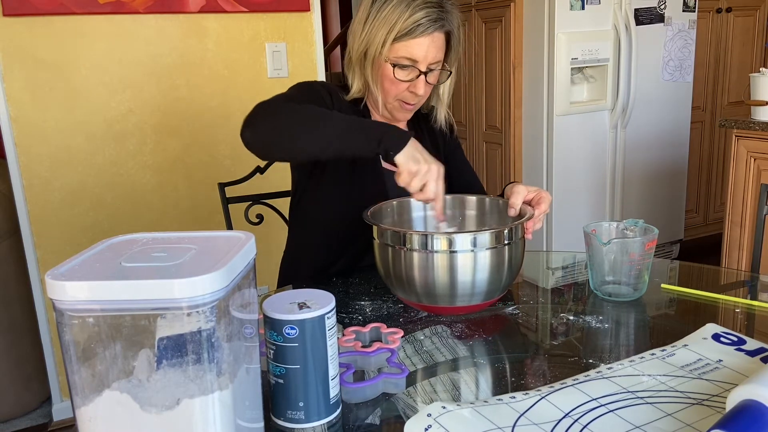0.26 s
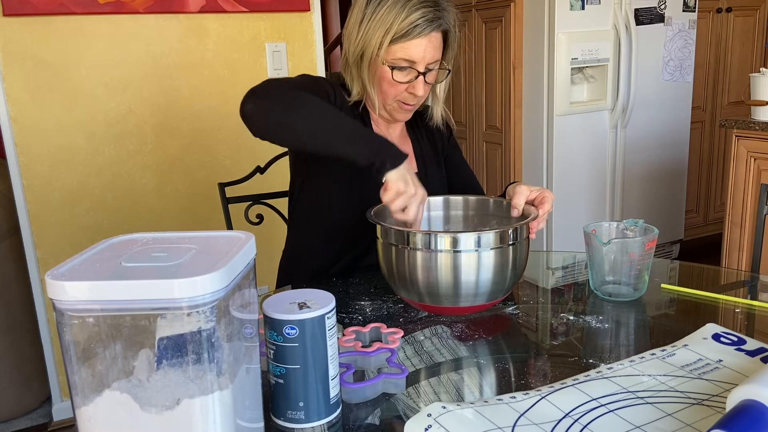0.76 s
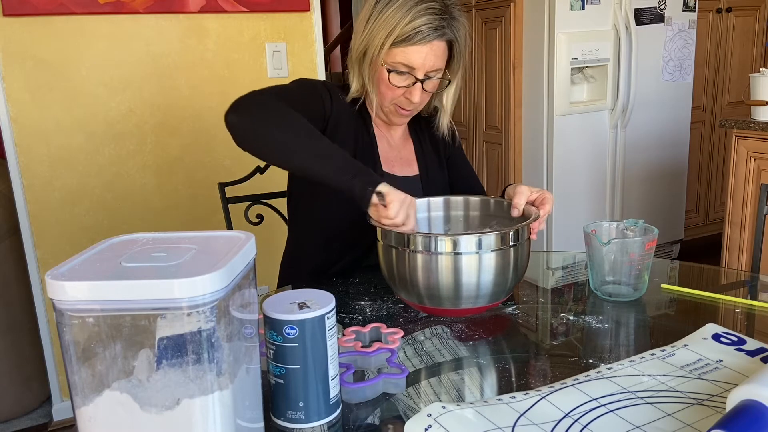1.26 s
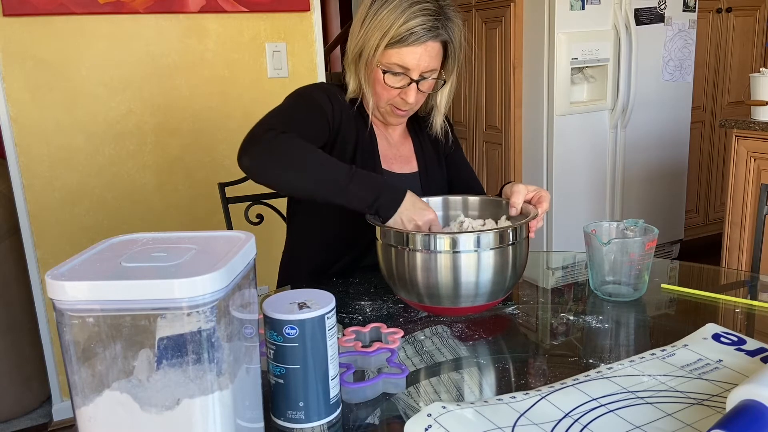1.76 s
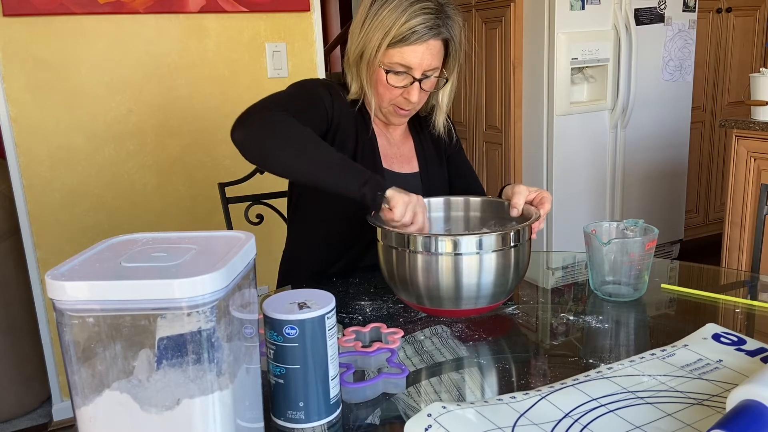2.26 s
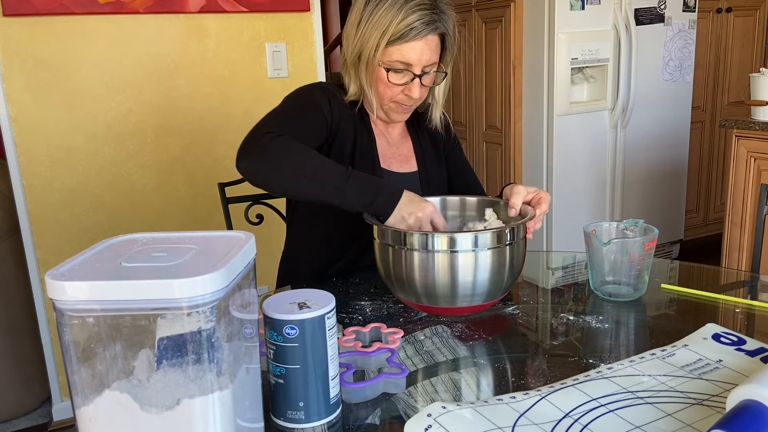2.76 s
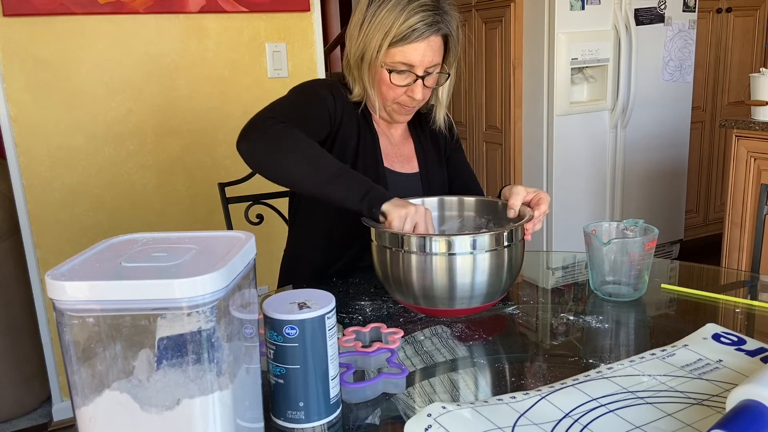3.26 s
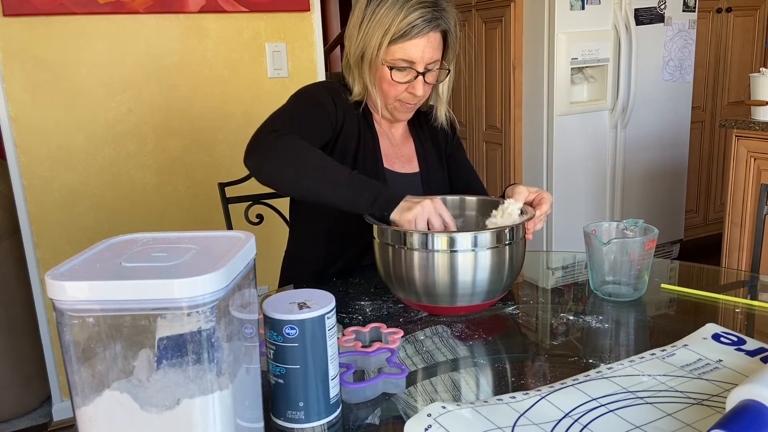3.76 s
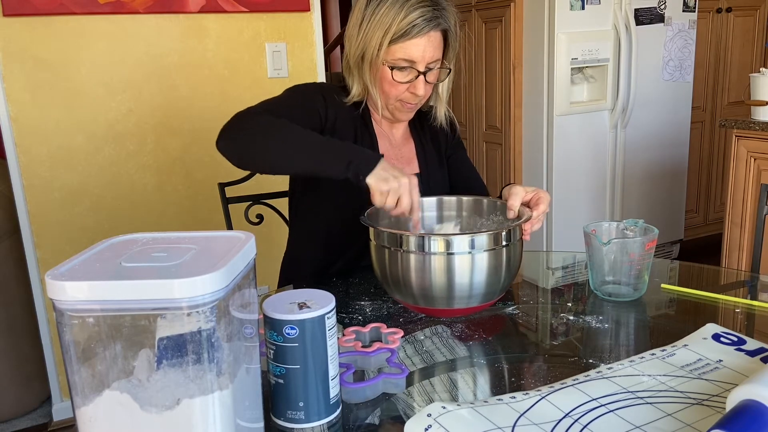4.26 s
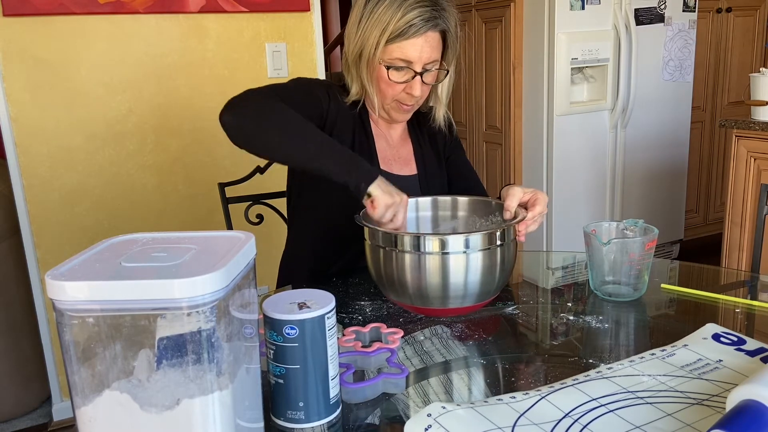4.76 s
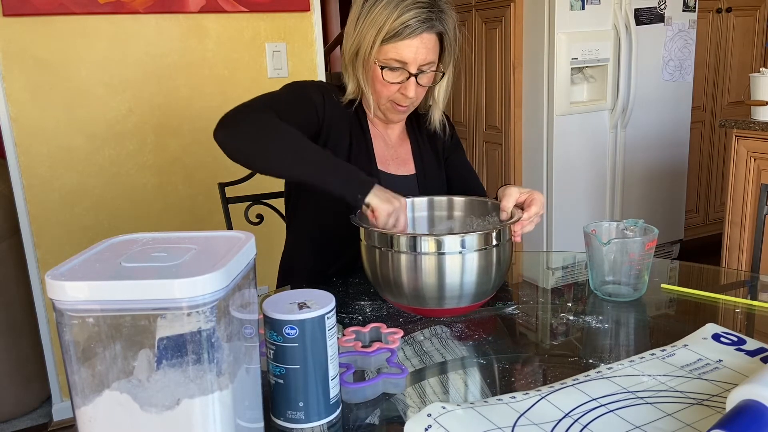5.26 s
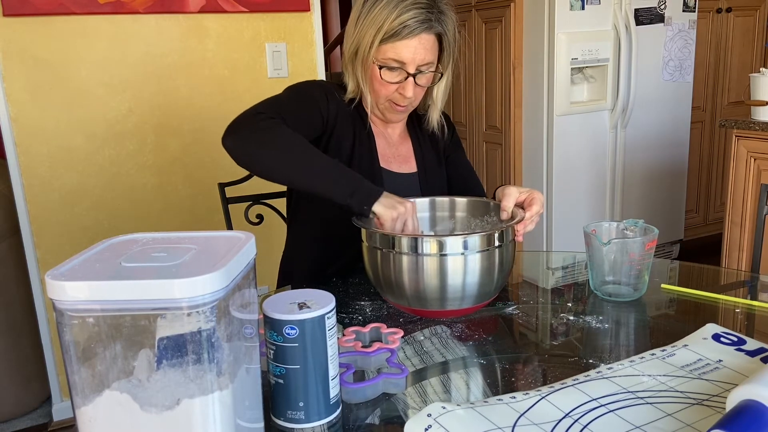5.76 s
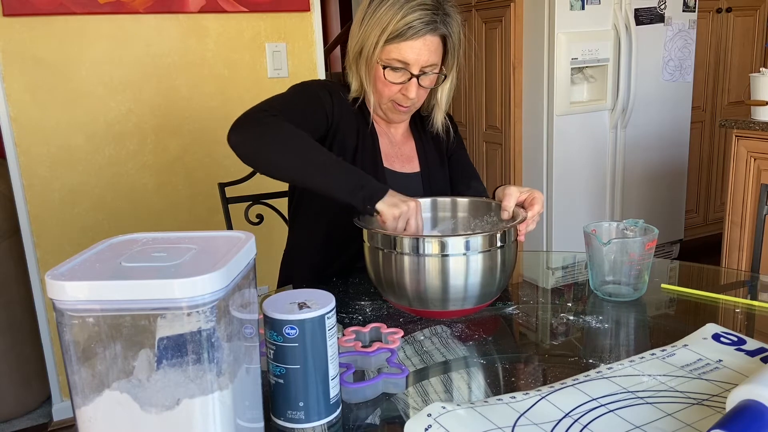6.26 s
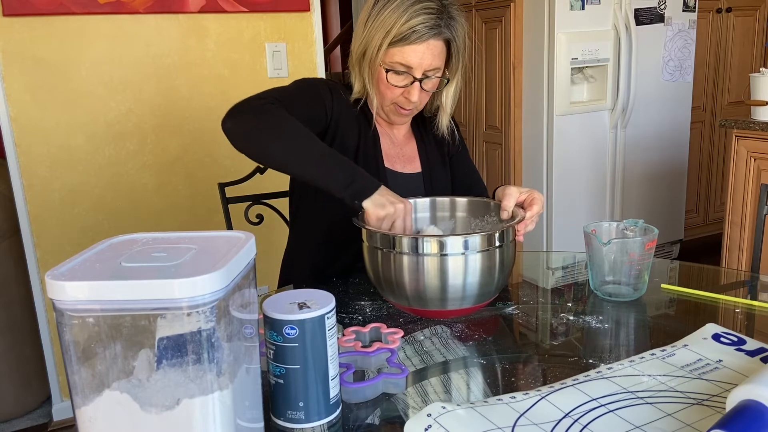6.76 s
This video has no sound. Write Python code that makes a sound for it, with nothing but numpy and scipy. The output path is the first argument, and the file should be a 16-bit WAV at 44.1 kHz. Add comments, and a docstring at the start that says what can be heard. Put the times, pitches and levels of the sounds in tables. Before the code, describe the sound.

Uneven stirring of thick dough in a metal bowl: one sharp clank early, then gritty scrapes, shrill steel rasps and floury swishes.

```python
"""Stiff dough is stirred in a steel bowl held by the rim on a kitchen table: loose flour swishes first, as noise swells.
Then strokes of the utensil grind and slide along the wall as filtered noise; some land with a knock, a dying sine.
Skids, rasps, taps and thumps on the table follow at listed times; swishes fill the gaps; of two faint squeaks, one
comes before the middle and one near the end. Damped modes ring after contacts with the wall. Throughout, a small
room reverberates, its low rumble goes on and a refrigerator hums in wavering sines."""
import sys
import numpy as np
from scipy import signal
from scipy.fft import rfft, irfft
from scipy.io import wavfile
from scipy.ndimage import uniform_filter1d

SR = 44100
rng = np.random.default_rng(int(sys.argv[2]) if len(sys.argv) > 2 else 0)


def to_wav(s):
    """Save 16-bit WAV."""
    ch = np.atleast_2d(s).T  # columns
    pcm = np.round(np.clip(ch, -1, 1) * 32767)  # PCM
    wavfile.write(sys.argv[1], SR, pcm.astype(np.int16))


N = 308259
TIME = np.arange(N) / SR
FREQS = np.fft.rfftfreq(N, 1 / SR)


def amp(db):
    """Decibels to gain."""
    return 10 ** (np.asarray(db) / 20)


def unit(x):
    """Scales to rms 1."""
    return x / np.sqrt(np.mean(x ** 2) + 1e-20)


def read(points, hz):
    """Interpolates a table on a log-frequency axis."""
    f, value = np.transpose(points)
    return np.interp(np.log(hz + 1), np.log(f + 1), value)


def add(mix, start_s, sound):
    """Adds a sound into the mix in place, cut at the end of the mix."""
    part = mix[max(round(start_s * SR), 0):][:len(sound)]
    part += sound[:len(part)]


def wander(rate_hz):
    """Random drift of rms 1, rolled off steeply above the rate."""
    spectrum = rfft(rng.standard_normal(N))
    return unit(irfft(spectrum / (1 + (FREQS / rate_hz) ** 4), N))


def colour(x, spectrum, size=4096):
    """Minimum-phase filter of unit energy whose skirts fall steeply outside the table."""
    hz = abs(np.fft.fftfreq(size, 1 / SR)) + 1
    low_skirt = np.minimum(hz / spectrum[0][0], 1) ** 4
    high_skirt = np.minimum(spectrum[-1][0] / hz, 1) ** 8
    log_gain = np.log(amp(read(spectrum, hz)) * low_skirt * high_skirt + 1e-5)
    taps = np.fft.ifft(np.exp(signal.hilbert(log_gain).conj())).real[:size // 2]
    return signal.oaconvolve(x, taps / np.linalg.norm(taps))[:N]


def slips(per_s, spread_db, smooth):
    """Friction as tiny random slips of uneven size over a smooth rub; rms 1."""
    size = amp(spread_db * np.minimum(rng.exponential(1, N), 4))
    hits = rng.random(N) < per_s / SR
    grains = size * rng.standard_normal(N) * hits
    return unit(unit(grains) + smooth * rng.standard_normal(N))


def travelling(x, patchy_db):
    """As the contact point travels it feeds ever different wall resonances: drifting gain patches."""
    z = signal.stft(x, nperseg=512, noverlap=384)[2]
    patches = rng.standard_normal(z.shape)
    for size, axis in [(3, 0), (2, 0), (14, 1), (7, 1)]:  # axis 0: frequency, 1: time
        patches = uniform_filter1d(patches, size, axis)
    return signal.istft(z * amp(patchy_db * unit(patches)), nperseg=512, noverlap=384)[1][:N]


# Colours of the three kinds of friction. Each row: frequency in Hz, relative density in dB.
GRIND_COLOUR = [(330, -7), (550, -2.5), (800, 0), (1250, 0), (1600, -4), (2100, -2), (3100, -4), (4300, -4),
                (5200, -9.5)]
SLIDE_COLOUR = [(4300, -13), (4650, -3.5), (5100, -6.5), (5600, -0.5), (6200, 0), (6800, -2), (7400, -5.5),
                (8200, -7.5), (9000, -28)]
FIZZ_COLOUR = [(7500, 11.2), (8600, 1.5), (9800, 6), (10700, 5), (12000, 1.5), (13500, 5.5), (14800, 0),
               (15600, 4)]
JUDDER_DB = 1.3  # rms unevenness of the push in the grinding


def scraping():
    """Friction along the wall; one uneven push of the hand shakes grinding, sliding and fizz together."""
    grind_db, slide_db, fizz_db, bite_db = friction_levels()
    judder = wander(rate_hz=62)

    rub = travelling(slips(per_s=1400, spread_db=1.0, smooth=0.84), patchy_db=4.0)
    rub = rub * amp(grind_db + JUDDER_DB * judder - 5.5)
    dull = signal.sosfiltfilt(signal.butter(2, 1500, fs=SR, output="sos"), rub)
    lift = amp(bite_db / 2)
    grind = colour(dull / lift + (rub - dull) * lift, GRIND_COLOUR)

    skid = travelling(slips(per_s=2900, spread_db=2.5, smooth=1.0), patchy_db=3.0)
    slide = colour(skid * amp(slide_db + 0.57 * JUDDER_DB * judder - 6.5), SLIDE_COLOUR)

    flour = travelling(rng.standard_normal(N), patchy_db=2.5)
    fizz = colour(flour * amp(fizz_db + 0.52 * judder + 2.0), FIZZ_COLOUR)

    # pressure carried into the table
    pressure = rng.standard_normal(N) * amp(grind_db - 11)
    rumble = colour(pressure, [(35, -3.5), (120, 1.5), (350, -22.5)])
    return grind + slide + fizz + rumble


# Utensil pushed through dough along the wall. Each row: start in seconds, length in seconds,
# rise in seconds, grinding in dB, bite (upper against lower grinding) in dB, edge sliding on steel in dB.
STROKE_ROWS = [ (0.422, 0.023, 0.0059, -38, 8.5, -38), (1.161, 0.55, 0.0018, -56, -2.5, -52.5),
               (2.251, 0.077, 0.052, -37, -5.5, -42.5), (2.336, 0.27, 0.025, -49.5, -2.5, -44.5),
               (3.235, 0.071, 0.035, -39, -9, -42), (3.305, .23, 0.11, -46.5, -6, -44),
               (3.981, 0.1, 0.015, -43.5, -6, -49), (4.513, 0.013, 0.0051, -53, -1, -47),
               (4.589, 0.094, 0.058, -44.5, -1.5, -51), (5.032, .18, 0.14, -43.5, -1.5, -43.5),
               (5.607, 0.11, 0.049, -42.5, -10, -43), (6.062, 0.14, 0.11, -38.5, -4, -40),
               (6.603, 0.097, 0.055, -44, -2, -40.5), ]
# Edge on bare steel as it enters or leaves the dough. Each row: start in seconds, length in seconds,
# sliding in dB, flour fizz in dB.
SKID_ROWS = [(0.425, 0.03, -30, -38.5), (1.179, 0.042, -40.5, -53), (1.673, 0.027, -40, -61),
             (2.317, 0.05, -41, -49), (2.486, 0.098, -34.5, -48), (2.58, 0.056, -42, -51),
             (3.51, 0.051, -39.5, -49.5), (4.077, .03, -53, -55), (4.506, .033, -57, -53.5),
             (5.029, .02, -46, -53.5), (5.062, 0.021, -34.5, -43.5), (5.223, 0.052, -44, -55.5),
             (5.567, 0.077, -37, -46.5), (5.745, 0.03, -44, -57), (6.053, 0.2, -37, -49.5),
             (6.269, 0.026, -40.5, -53), (6.53, 0.02, -57, -76), (6.572, 0.025, -37, -41.5)]
# Loose flour as the dough turns over. Each row: time of the peak in seconds,
# rise and equal fall in seconds, hiss in dB.
SWISH_ROWS = [(0.075, 0.15, -59), (0.292, 0.11, -69), (0.68, 0.17, -62.5), (0.85, 0.11, -78),
              (1.02, .07, -70.5), (1.61, .35, -54.5), (1.872, 0.19, -68), (2.13, 0.25, -80),
              (2.802, 0.34, -67.5), (3.03, 0.31, -66), (3.225, 0.1, -57.5), (3.709, 0.29, -64.5),
              (3.913, 0.085, -65), (4.18, 0.12, -63.5), (4.37, 0.12, -68.5), (4.502, 0.074, -69.5),
              (4.60, 0.043, -57.5), (4.702, 0.071, -52.5), (4.808, .085, -63.5), (4.918, 0.065, -69.5),
              (5.002, 0.07, -70.5), (5.418, 0.057, -68), (5.517, 0.061, -66), (5.808, .11, -56),
              (5.985, 0.12, -63), (6.35, .12, -53), (6.52, 0.17, -66.5), (6.82, 0.13, -57.5),
              (6.97, 0.12, -69.5)]
# Utensil never quite at rest. In order: grinding in dB, sliding in dB, fizz in dB.
RESTING_LEVELS_DB = (-84.5, -86, -89)
STROKE_RELEASE_DB_PER_S, SKID_RELEASE_DB_PER_S, SKID_RISE_S = 272, 313, 0.028
STROKE_FIZZ_DB, SKID_GRIND_DB = -11, -20.5  # against the sliding
SWISH_GRIND_DB, SWISH_FIZZ_DB = -11.5, -4  # against the hiss


def friction_levels():
    """Contacts add power to grinding, sliding and fizz; returns these in dB and the mean bite in dB."""
    grind, slide, fizz = amp(RESTING_LEVELS_DB)[:, None] ** 2 * np.ones(N)
    bite = np.zeros(N)
    for start_s, length_s, rise_s, grind_db, bite_db, slide_db in STROKE_ROWS:
        power = push(start_s, length_s, rise_s, STROKE_RELEASE_DB_PER_S) ** 2
        grind += power * amp(grind_db) ** 2
        bite += power * amp(grind_db) ** 2 * bite_db
        slide += power * amp(slide_db) ** 2
        fizz += power * amp(slide_db + STROKE_FIZZ_DB) ** 2
    for start_s, length_s, slide_db, fizz_db in SKID_ROWS:
        power = push(start_s, length_s, SKID_RISE_S, SKID_RELEASE_DB_PER_S) ** 2
        grind += power * amp(slide_db + SKID_GRIND_DB) ** 2
        slide += power * amp(slide_db) ** 2
        fizz += power * amp(fizz_db) ** 2
    for peak_s, rise_s, hiss_db in SWISH_ROWS:
        swell = (1 + np.cos(np.pi * np.clip((TIME - peak_s) / rise_s, -1, 1))) / 2
        power = (amp(hiss_db) * swell) ** 2
        grind += power * amp(SWISH_GRIND_DB) ** 2
        slide += power
        fizz += power * amp(SWISH_FIZZ_DB) ** 2
    grind_db, slide_db, fizz_db = 10 * np.log10([grind, slide, fizz])
    return grind_db, slide_db, fizz_db, bite / grind


TOUCH = 0.084  # share of full force at first contact
SAG_DB_PER_S = 4


def push(start_s, length_s, rise_s, release_db_per_s):
    """Force of one contact: touches, builds up, slackens a little, dies away when let go."""
    age_s = TIME - start_s
    build = np.clip(TOUCH + age_s / rise_s, 0, 1) * (age_s >= 0)
    sag_db = SAG_DB_PER_S * np.maximum(age_s, 0)
    release_db = release_db_per_s * np.maximum(age_s - length_s, 0)
    return build * amp(-np.minimum(sag_db + release_db, 200))


# Edge chattering on bare steel. Each row: start in seconds, relative level in dB, pitch in Hz,
# length in seconds.
CATCH_ROWS = [(1.181, -36, 6000, 0.032), (1.21, -28, 6300, 0.014), (2.37, -28, 5870, 0.016),
              (2.537, -28, 6400, 0.032), (3.52, -40, 6130, 0.02), (4.542, -42, 5900, 0.011),
              (5.086, -30.5, 5950, 0.024), (5.261, -31.5, 5640, 0.012), (5.574, -31.5, 6040, 0.027),
              (5.616, -29.5, 5270, 0.03), (6.0643, -26, 5840, 0.08), (6.111, -22, 6200, 0.018),
              (6.171, -21.5, 6060, 0.016), (6.228, -27.5, 5800, 0.021), (6.583, -31, 6800, 0.036)]


def catches(level_db, width_hz):
    """Short shrill rasps: rapid slips excite a narrow group of wall resonances, as band noise."""
    out = np.zeros(N)
    for start_s, db, hz, length_s in CATCH_ROWS:
        t = np.arange(0, length_s, 1 / SR)
        edges_hz = [hz - width_hz / 2, hz + width_hz / 2]
        band = signal.butter(2, edges_hz, "bandpass", fs=SR, output="sos")
        rasp = unit(signal.sosfilt(band, rng.standard_normal(len(t))))
        swell = np.sin(np.pi * np.sqrt(t / t[-1]))
        add(out, start_s, amp(db + level_db) * rasp * swell)
    return out


# Faint squeaks of the dragging edge. Each row: start in seconds, length in seconds, mean pitch in Hz,
# relative level in dB.
SQUEAK_ROWS = [(2.91, 0.14, 3340, -80), (6.365, 0.11, 3450, -69.5)]


def squeaks(level_db, waver):
    """Steady stick and slip of the edge: thin whistles, waver being the rms share of pitch."""
    out, drift = np.zeros(N), wander(rate_hz=80)
    for start_s, length_s, hz, db in SQUEAK_ROWS:
        swell = signal.windows.hann(round(length_s * SR))
        pitch_hz = hz * (1 + waver * drift[round(start_s * SR):][:len(swell)])
        turns = np.cumsum(pitch_hz) / SR
        add(out, start_s, amp(db + level_db) * swell[:len(turns)] * np.sin(2 * np.pi * turns))
    return out


# Utensil landing on the wall. Each row: start in seconds, relative peak in dB,
# pitch once the decay constant has passed in Hz, decay constant in cycles of that pitch.
KNOCK_ROWS = [(0.425, -18.5, 568, 1), (0.446, -25.5, 680, 0.81), (2.245, -28, 547, 0.86),
              (2.256, -31, 444, 0.93), (3.242, -34, 282, 1), (3.987, -33.5, 780, 0.98), (4.51, -42, 290, 1)]


def knocks():
    """Muffled knocks of the utensil on the wall."""
    return blows(KNOCK_ROWS, level_db=-1, glide=0.99, rattle_db=-13, rattle_s=0.013)


def blows(rows, level_db, glide, rattle_db, rattle_s):
    """Blows cushioned by dough: a few dying cycles, and a short dull rattle as the parts settle."""
    out, t = np.zeros(N), np.arange(SR // 5) / SR
    for start_s, db, hz, cycles in rows:
        age = t * hz / cycles  # in decay constants
        pitch_hz = hz * np.exp(glide * (np.exp(-age) - np.exp(-1)))  # high bending waves arrive first
        swing = np.sin(2 * np.pi * np.cumsum(pitch_hz) / SR) * age ** 0.55 * np.exp(-age)
        band = signal.butter(2, [0.59 * hz, 1.8 * hz], "bandpass", fs=SR, output="sos")
        rattle = unit(signal.sosfilt(band, rng.standard_normal(len(t)))) * np.exp(-t / rattle_s)
        blow = swing / abs(swing).max() + amp(rattle_db) * rattle
        add(out, start_s, amp(db + level_db) * blow)
    return out


# Light taps of the utensil. Each row: start in seconds, relative level in dB.
TICK_ROWS = [(0.7913, -45.5), (1.0095, -65), (1.1594, -63), (2.089, -57), (2.141, -47.5), (2.2436, -40),
             (3.9883, -39), (4.511, -40), (5.4864, -80)]


def ticks(level_db, decay_s):
    """Tiny dry taps: decaying noise, brightened."""
    out, t = np.zeros(N), np.arange(SR // 20) / SR
    for start_s, db in TICK_ROWS:
        add(out, start_s, amp(db + level_db) * rng.standard_normal(len(t)) * np.exp(-t / decay_s))
    return colour(out, [(1200, 4.0), (4000, 11.0), (8000, 9), (16000, 14)])


# Modes of the steel wall. Each row: frequency in Hz, relative level in dB.
BOWL_MODES = [(320, -1.5), (405, 0.5), (496, 5), (600, -1), (728, -3), (1030, -2), (1325, 0.5), (2030, -18),
              (2340, -7), (2920, -8), (4170, -24.5), (4690, 2), (5430, -1), (5770, -8.5), (6030, -1),
              (6195, 1), (6340, -12), (6495, -10), (6780, 8.5)]


def bowl(x, t60_s, spread_rad):
    """Wall modes, damped by hand and dough, ring after each touch; out of step at the two ports."""
    t = np.arange(SR // 2) / SR
    decay_per_s, sides = np.log(1000) / t60_s, np.array([[1], [-1]])
    skews = spread_rad * rng.uniform(-0.81, 1, len(BOWL_MODES))
    modes = sum(amp(db) * np.cos(2 * np.pi * hz * t + sides * skew)
                for (hz, db), skew in zip(BOWL_MODES, skews))
    ring = modes * np.exp(-decay_per_s * t) * 2 * decay_per_s / SR
    return x + signal.fftconvolve(x[None], ring, axes=1)[:, :N]


# Bowl and dough bumping the table. Each row: start in seconds, peak of the swing in dB,
# pitch once the decay constant has passed in Hz, decay constant in cycles of that pitch.
THUMP_ROWS = [(0.426, -28, 369, 1.25), (0.89, -42.5, 108, 2.6), (2.151, -40, 119, 1.45),
              (3.24, -39, 268, 3.5), (5.229, -33, 108, 1.03), (5.536, -39, 115, 2),
              (5.624, -39.5, 121, 1.3), (6.121, -42, 115, 1.2), (6.61, -34, 178, 0.94)]


def thumps():
    """The rubber foot thumps on the table: low blows that do not ring the bowl."""
    return blows(THUMP_ROWS, level_db=0, glide=0.72, rattle_db=-1, rattle_s=0.019)


# Reverberation time of the room. Each row: frequency in Hz, t60 in seconds.
ROOM_T60_S = [(100, 0.38), (500, 0.44), (2000, 0.415), (6000, 0.29), (15000, 1.46)]
# Reverberation level. Each row: frequency in Hz, level against the direct sound in dB.
ROOM_LEVEL_DB = [(35, -13.5), (120, -7), (500, -5.5), (2000, 0), (6000, -4.5), (8500, -23), (15000, -24)]


def kitchen(x, first_s):
    """Direct sound and dense reflections, different at each port, each band dying at its own speed."""
    taps = rng.standard_normal((2, SR)) * (rng.random((2, SR)) < 3000 / SR)
    hz, t, z = signal.stft(unit(taps), SR, nperseg=256)
    decay_per_s = np.log(1000) / read(ROOM_T60_S, hz)[:, None]
    gain = np.sqrt(2 * decay_per_s / SR) * amp(read(ROOM_LEVEL_DB, hz))[:, None]
    tail = signal.istft(z * np.exp(-decay_per_s * t) * gain, SR, nperseg=256)[1]
    tail = np.pad(tail, ((0, 0), (round(first_s * SR), 0)))
    return x + signal.fftconvolve(x, tail, axes=1)[:, :N]


# Rumble of the house. Each row: frequency in Hz, relative density in dB.
HUSH_COLOUR = [(12, -48), (20, -54), (41, -8.5), (65, -6.5), (129, -5), (157, -15.5), (180, -13.5),
               (210, -19.5), (299, -15.5), (466, -23.5), (509, -25.5), (926, -32.5), (1130, -34.5),
               (1610, -45), (4000, -60), (5200, -94), (8800, -120)]
# Likeness of the rumble at the two ports. Each row: frequency in Hz, correlation 0 to 1.
PORT_LIKENESS = [(30, 1), (65, 0.48), (130, 0), (300, 0.67), (1000, 0), (4000, 0.6)]
# Hum of the refrigerator. Each row: frequency in Hz, relative level in dB.
HUM_LINES = [(59.8, -54), (186, -64.5)]
HUSH_DB = -50.5  # rms


def background(hum_db):
    """Low rumble of the house as shaped noise; refrigerator hum as slightly wavering sines."""
    left, other = rfft(rng.standard_normal((2, N)))
    same = read(PORT_LIKENESS, FREQS)
    pair = np.array([left, same * left + np.sqrt(1 - same ** 2) * other])
    hush = unit(irfft(pair * amp(read(HUSH_COLOUR, FREQS)), N))
    waver_db, slip_rad = 2 * wander(rate_hz=2), 0.5 * wander(rate_hz=3)
    hum = sum(amp(db + waver_db) * np.sqrt(2) * np.sin(2 * np.pi * hz * TIME + slip_rad)
              for hz, db in HUM_LINES)
    return amp(HUSH_DB) * hush + amp(hum_db) * hum


def scene():
    """Friction, knocks and taps ring the bowl; thumps go through the table; the kitchen surrounds all."""
    friction = scraping() + catches(level_db=-11.5, width_hz=810) + squeaks(level_db=5, waver=0.0093)
    taps = knocks() + ticks(level_db=-7, decay_s=0.002)
    dry = bowl(friction + taps, t60_s=0.097, spread_rad=1.13) + thumps()
    return kitchen(dry, first_s=0.003) + background(hum_db=-1.5)


# Phase lead of the left port over the right. Each row: frequency in Hz, lead in radians.
LEFT_LEAD = [(0, 0), (4500, 0), (5600, -.8), (6600, .3), (7200, 0), (9200, -3.14), (10900, -6.28),
             (11600, -6.28), (13400, -9.42), (14900, -12.57)]
EDGE_HZ = 15900


def record(dry):
    """Two microphone ports drift apart in phase through the treble; a low-pass sets the band limit."""
    lead_rad = np.interp(FREQS, *np.transpose(LEFT_LEAD))
    turn = np.exp(0.5j * np.array([lead_rad, -lead_rad]))
    ports = irfft(rfft(dry) * turn, N)
    lowpass = signal.firwin(511, EDGE_HZ, window=("kaiser", 9), fs=SR)
    return signal.oaconvolve(ports, lowpass[None], "same")


dry = scene()
out = record(dry)
to_wav(out)
```